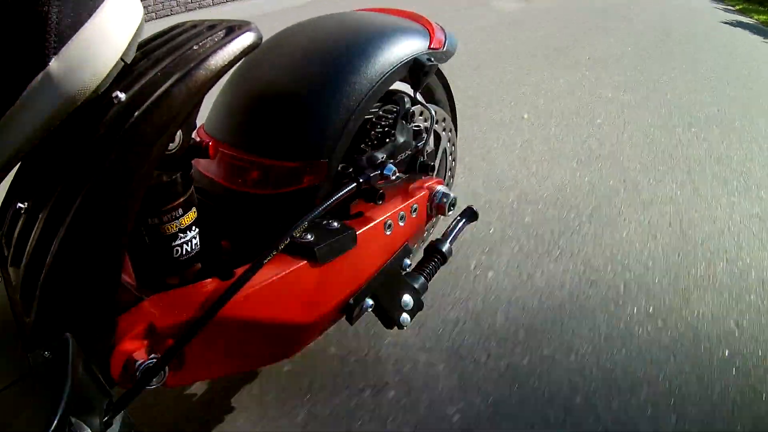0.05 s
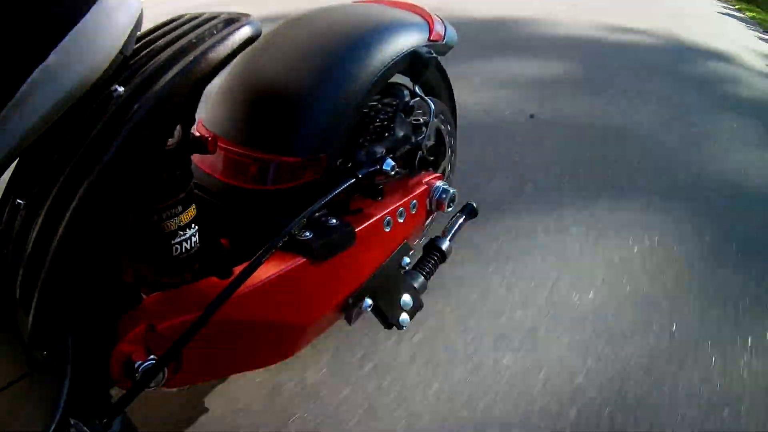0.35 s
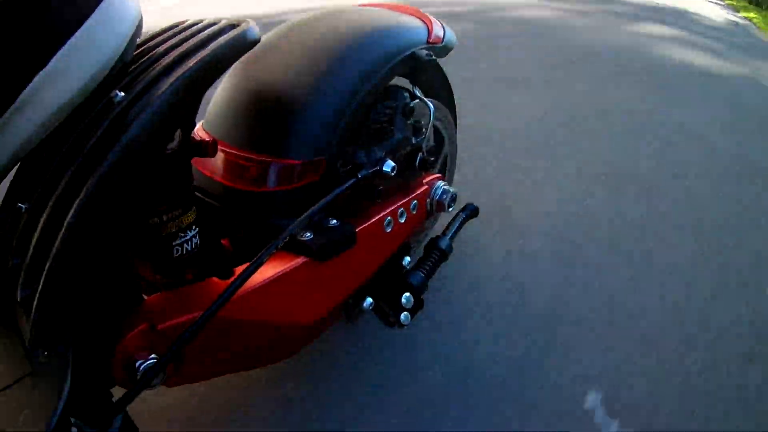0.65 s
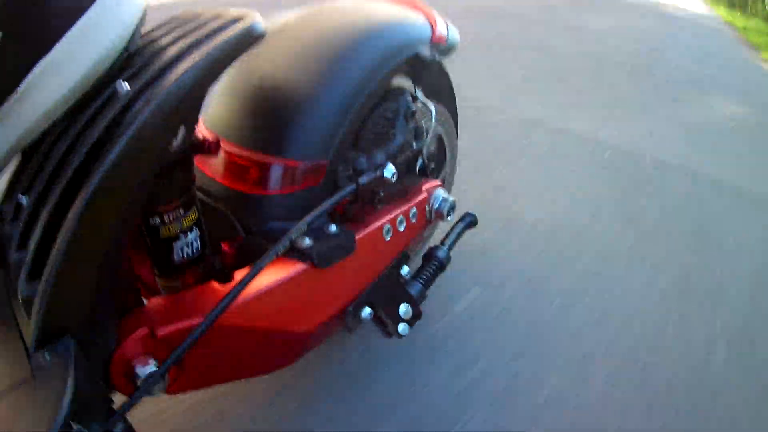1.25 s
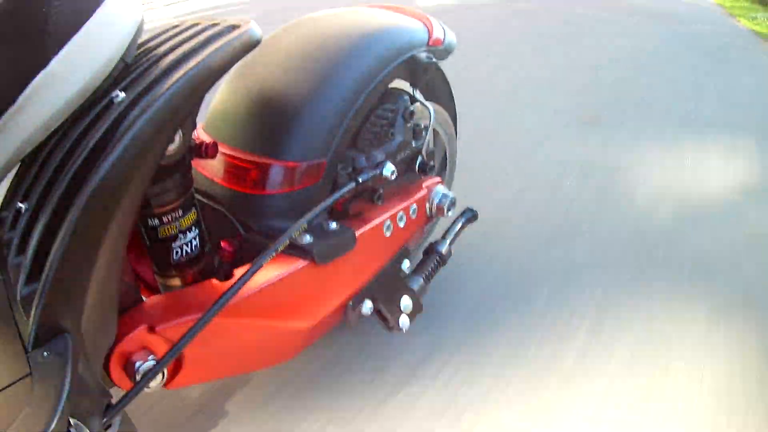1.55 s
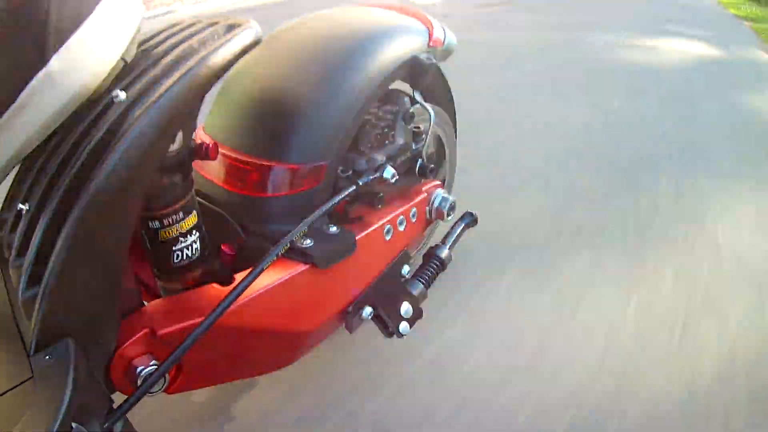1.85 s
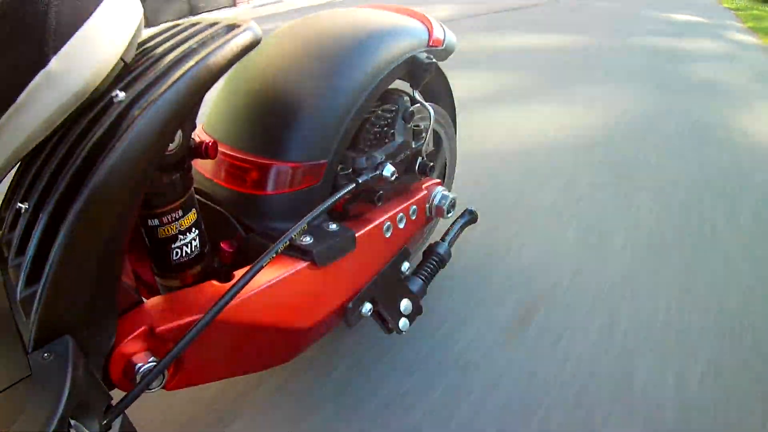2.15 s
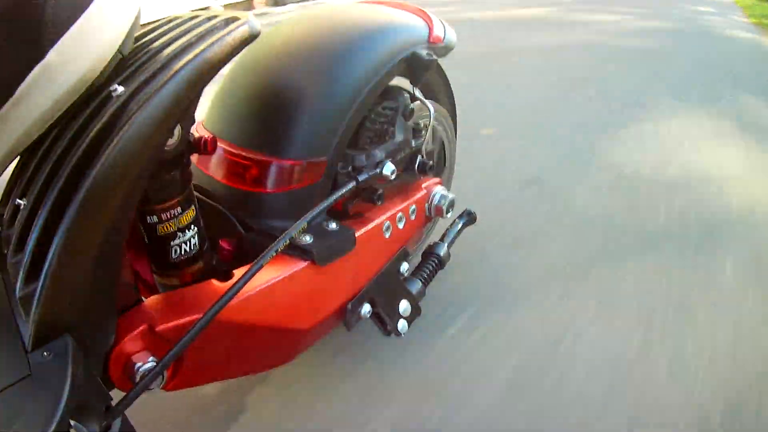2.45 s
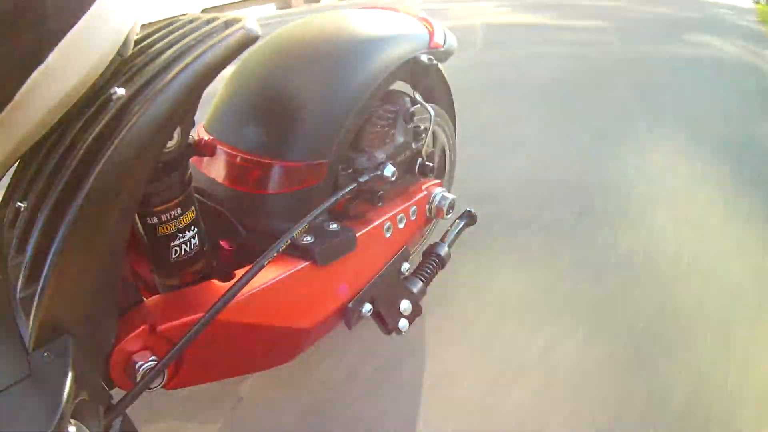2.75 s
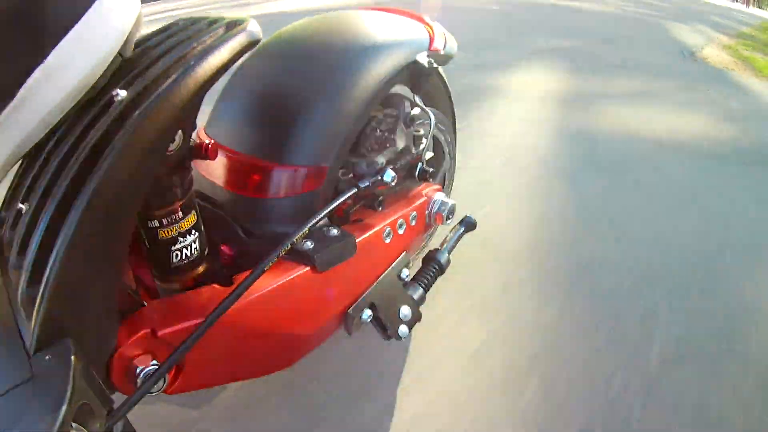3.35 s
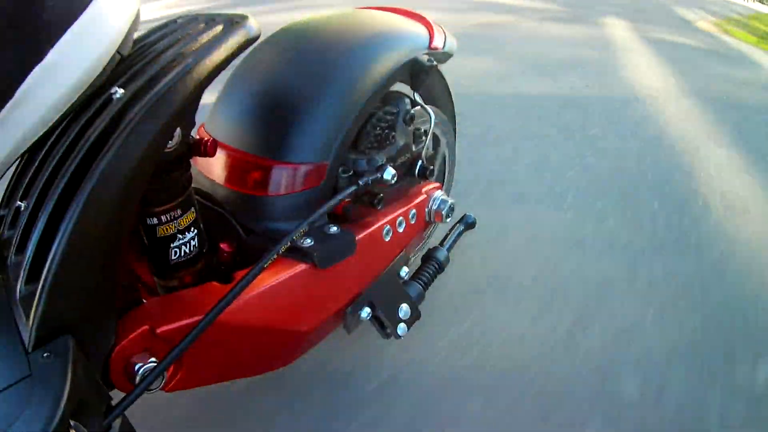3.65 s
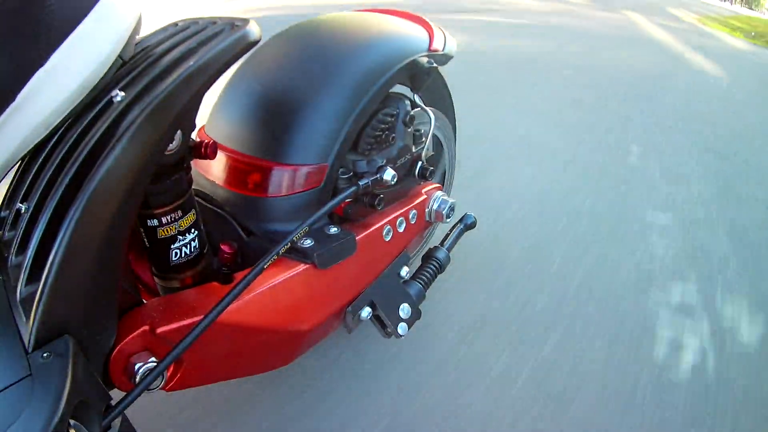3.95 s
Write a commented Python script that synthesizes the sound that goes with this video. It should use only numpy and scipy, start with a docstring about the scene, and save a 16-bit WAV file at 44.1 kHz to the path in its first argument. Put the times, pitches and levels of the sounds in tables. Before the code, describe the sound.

An electric scooter rumbles over asphalt, knocking and rattling at the bumps.

```python
"""Electric scooter on asphalt

Heard beside the rear wheel. The road shakes the frame, which rumbles, knocks and ticks;
two rough patches make the suspension clack. The tyre hisses near 1 kHz and the hub motor
hums faintly. From halfway on the disc brake rubs lightly."""
import sys
import numpy as np
from scipy.fft import rfft, irfft, next_fast_len
from scipy.io import wavfile
from scipy.ndimage import uniform_filter1d, map_coordinates

SR = 44100
rng = np.random.default_rng(int(sys.argv[2]) if len(sys.argv) > 2 else 0)


def dump(signal):
    """Clip the signal to [-1, 1] and save it as 16-bit WAV at the path in sys.argv[1]."""
    limited = np.clip(np.atleast_2d(signal).T, -1, 1)
    pcm = np.round(limited * 32767).astype(np.int16)
    wavfile.write(sys.argv[1], SR, pcm)


N = 176400
HIT_SAMPLES = 4096
HIT_TIME_S = np.arange(HIT_SAMPLES) / SR

# Spectra of a loose part's knock, its thump and a fitting's tick. Each row: frequency in Hz, gain in dB.
KNOCK_SPECTRUM = [(200, -19.5), (600, -0.5), (1100, 10), (1600, -0.5), (2000, -2), (2450, -12.5),
                  (2950, -22), (3400, -23), (4200, -17), (5000, -63), (6200, -33), (7500, -40),
                  (15000, -29)]
THUMP_SPECTRUM = [(15, -26), (40, 2), (100, 0.5), (200, 5.5), (350, -1.5), (550, -9), (800, -16.5),
                  (2000, -43.5), (6000, -79)]
TICK_SPECTRUM = [(1500, -35), (2900, -6), (3500, 7.5), (4100, 4), (4900, -13.5), (5500, 1), (6400, -9),
                 (7500, -30), (10400, -10), (13000, -30)]


def amp(db):
    return 10 ** (np.asarray(db) / 20)


def unit_rms(x):
    return x / np.sqrt(np.mean(x ** 2) + 1e-20)


def unit_hit(x):
    """Scale to the energy of 10 ms at rms 1."""
    return x * np.sqrt(0.01 * SR / (np.sum(x ** 2) + 1e-20))


def decay(t60_s, hold_s=0):
    return amp(-60 * np.maximum(HIT_TIME_S - hold_s, 0) / t60_s)


def gain_at(spectrum, hz):
    """Linear gain from (Hz, dB) rows, on a log frequency axis."""
    knots_hz, db = np.transpose(spectrum)
    return amp(np.interp(np.log(hz + 1), np.log(knots_hz + 1), db))


def curves(rows):
    """One per-sample curve for each column after the time."""
    times_s, *columns = np.transpose(rows)
    return [np.interp(np.arange(N) / SR, times_s, column) for column in columns]


def wobble(rate_hz):
    """Smooth random curve with knots at rate_hz."""
    knots = rng.standard_normal(int(N * rate_hz / SR) + 4)
    return map_coordinates(knots, [np.arange(N) * rate_hz / SR])


def filtered(x, response):
    size = next_fast_len(N + SR // 2)
    return irfft(rfft(x, size) * response(np.fft.rfftfreq(size, 1 / SR)), size)[:N]


def noise(spectrum):
    return unit_rms(filtered(rng.standard_normal(N), lambda hz: gain_at(spectrum, hz)))


def noise_band(centre_hz, width_hz):
    """Narrow noise of rms 1; the centre may move."""
    lowpass = lambda hz: 1 / (1 + (2 * hz / width_hz) ** 2)
    a, b = (filtered(rng.standard_normal(N), lowpass) for _ in range(2))
    phase = 2 * np.pi * np.cumsum(centre_hz * np.ones(N)) / SR
    return unit_rms(a * np.cos(phase) + b * np.sin(phase))


def contact(spectrum, t60_s, grit):
    """Impulse with a gritty tail, through a minimum-phase filter."""
    force = grit * unit_hit(rng.standard_normal(HIT_SAMPLES) * decay(t60_s))
    force[0] -= np.sqrt(0.01 * SR)
    cepstrum = irfft(np.log(gain_at(spectrum, np.fft.rfftfreq(HIT_SAMPLES, 1 / SR))))
    cepstrum[1:HIT_SAMPLES // 2] *= 2
    cepstrum[HIT_SAMPLES // 2 + 1:] = 0
    return unit_hit(irfft(rfft(force) * np.exp(rfft(cepstrum))))


def ping(spectrum, t60_s, count):
    """Small metal part ringing in count random modes under the spectrum."""
    place, phase = rng.uniform(0, 1, (2, count))
    hz = np.interp(np.arange(count) + place, [0, count], [spectrum[0][0], spectrum[-1][0]])
    modes = np.sin(2 * np.pi * (hz[:, None] * HIT_TIME_S + phase[:, None]))
    attack = np.minimum(HIT_TIME_S / 0.0005, 1)
    return unit_hit(gain_at(spectrum, hz) @ modes * decay(t60_s) * attack)


def add(track, start_s, sound):
    i = int(np.clip(round(start_s * SR), 0, N))
    track[i:i + len(sound)] += sound[:N - i]


def frame_rumble(shake_db, turns):
    """The road shakes the frame: rumble swelling once a turn, plus wheel harmonics."""
    # Each row: frequency in Hz, gain in dB.
    spectrum = [(12, -38), (20, 1.5), (30, 5), (55, 1), (120, 0.5), (200, -3.5), (260, -19.5), (350, -20.5),
                (520, -26), (700, -32.5), (900, -26.5), (1200, -74), (2000, -100)]
    # Each row: multiple of the wheel rate, level in dB re the shake.
    harmonics = [(2, -10), (3, -13.5), (4, -18), (5, -21.5)]
    throb_db = 3.5 * np.cos(2 * np.pi * turns)
    out = amp(-2) * noise(spectrum) * unit_rms(amp(throb_db + 1.67 * wobble(45)))
    for multiple, db in harmonics:
        sway = np.sin(2 * np.pi * multiple * turns + 0.5 * wobble(7.8))
        out += amp(db) * unit_rms(sway * amp(4.8 * wobble(13)))
    return amp(shake_db) * out


def suspension_clacks():
    """The suspension hits its stop: metal chatters for a few ms, then the frame rings out."""
    # Each row: start in seconds, level in dB, main ring in Hz, ring in dB re the frame,
    # chatter in seconds, mode tilt in dB per octave, crash in dB re the frame.
    strikes = [(1.1117, -9.5, 1166, -7.5, 0.0049, -1, -19), (2.789, -23, 1860, 5.5, 0.0045, 3, -15),
               (2.917, -12.5, 1254, -2, 0.0056, -1.5, -24.5)]
    # Each row: frequency in Hz, relative level in dB, T60 in seconds.
    frame_modes = [(614, -8.5, 0.037), (1089, 4.5, 0.035), (1304, 4.5, 0.028), (1607, 3.5, 0.016),
                   (1867, 0, 0.047), (2050, 5, 0.018), (2232, -8.5, 0.071), (3440, -13.5, 0.035),
                   (4170, -33, 0.044), (4210, -29, 0.05), (4670, -34, 0.085)]
    # Gritty metal contact. Each row: frequency in Hz, gain in dB.
    crash_spectrum = [(2500, -32), (3400, -1), (4400, 3.5), (5100, -8), (6700, -13), (7500, -34),
                      (10000, -46)]
    out = np.zeros(N)
    attack = 1 - np.exp(-HIT_TIME_S / 0.0012)
    for start_s, db, ring_hz, ring_db, chatter_s, tilt_db, crash_db in strikes:
        frame = np.zeros(HIT_SAMPLES)
        for hz, mode_db, t60_s in frame_modes:
            drift_rad = rng.uniform(0, 2 * np.pi) + np.cumsum(rng.normal(0, 0.069, HIT_SAMPLES))
            mode = np.sin(2 * np.pi * hz * HIT_TIME_S + uniform_filter1d(drift_rad, size=40))
            frame += amp(mode_db + tilt_db * np.log2(hz)) * attack * decay(t60_s, chatter_s) * mode
        ring = unit_hit(attack * decay(0.021, chatter_s) * np.sin(2 * np.pi * ring_hz * HIT_TIME_S))
        crash = contact(crash_spectrum, t60_s=0.088, grit=1.2)
        add(out, start_s, amp(db) * (unit_hit(frame) + amp(ring_db) * ring + amp(crash_db) * crash))
    return out


def knocks():
    """Loose parts knock at the bumps, each with a low thump."""
    # Each row: start in seconds, relative level in dB, thump boost in dB.
    hits = [(.003, -21.5, 10), (0.157, -31, 22), (0.2671, -30.5, 22), (.324, -33.5, 22.5),
            (0.694, -33, 21.5), (1.089, -22.5, 9.5), (1.102, -30.5, 22.5), (1.1177, -21.5, 19.5),
            (1.144, -15, 11), (1.173, -27.5, 18.5), (1.261, -24.5, 0), (1.27, -19, 14), (1.309, -23, 3),
            (1.331, -21, 7), (1.396, -29, 15.5), (1.405, -24.5, 20), (1.4311, -25.5, 15),
            (1.455, -26.5, 20), (1.5337, -26, 5.5), (1.5866, -27, 11.5), (1.6946, -34.5, 9),
            (1.7449, -27.5, 10.5), (1.7993, -30.5, 18), (1.826, -32, 20.5), (2.62, -30, 18),
            (2.9577, -13, 8), (3.0202, -21.5, 4), (3.0496, -27.5, 23), (3.076, -24, 15.5),
            (3.1074, -24, 5.5), (3.153, -22.5, 15), (3.2023, -22.5, 14), (3.252, -25, 17.5),
            (3.279, -24.5, 12)]
    out = np.zeros(N)
    for start_s, db, boost_db in hits:
        add(out, start_s, amp(db - 7.5) * contact(KNOCK_SPECTRUM, t60_s=0.021, grit=1.0))
        add(out, start_s, amp(db + boost_db - 10) * contact(THUMP_SPECTRUM, t60_s=0.032, grit=0.76))
    return out


def claps():
    """A hard, light part, likely the mudguard, claps against its stay."""
    # Each row: start in seconds, relative level in dB.
    hits = [(0.1017, -23), (.486, -28.5), (.537, -22.5), (0.5895, -27.5), (0.642, -26), (1.556, -30.5),
            (2.08, -31)]
    # Each row: frequency in Hz, gain in dB.
    spectrum = [(100, -11), (700, 5.5), (1400, 5.5), (1950, -2), (2450, -3.5), (3000, -22), (4100, -23),
                (7000, -46)]
    out = np.zeros(N)
    for start_s, db in hits:
        add(out, start_s, amp(db - 5) * contact(spectrum, t60_s=0.018, grit=2.8))
    return out


def wheel_rattle(shake_db, turns):
    """Loose parts bounce lightly twice a turn, louder with the shake up to a cap."""
    cap_db, limp_db, scatter_db, jitter_s = -17, 0.5, 3.5, 0.003
    out = np.zeros(N)
    bounces = np.flatnonzero(np.diff(np.floor(2 * turns)) > 0)
    for k, i in enumerate(bounces):
        start_s = i / SR + rng.normal(0, jitter_s)
        db = min(shake_db[i], cap_db) - 18 + limp_db * (-1) ** k + rng.normal(0, scatter_db)
        knock = amp(-3.5) * contact(KNOCK_SPECTRUM, t60_s=0.014, grit=1.5)
        thump = amp(10) * contact(THUMP_SPECTRUM, t60_s=0.023, grit=2.3)
        tick = amp(-20) * contact(TICK_SPECTRUM, t60_s=0.022, grit=1.0)
        add(out, start_s, amp(db) * (knock + thump + tick))
    return out


def tyre():
    """Tread noise, strongest just over 1 kHz, where stones and seams also ring the casing."""
    # Each row: time in seconds, level in dB.
    tread_levels = [(0, -41), (1.3, -41.5), (1.7, -45), (2.3, -38), (3.1, -38), (3.4, -40.5), (4, -39.5)]
    # Each row: frequency in Hz, gain in dB.
    spectrum = [(180, -68), (300, -8), (318, -25), (360, -6.5), (472, -32.5), (550, -10.5), (756, -19.5),
                (981, -17.5), (1030, -7), (1220, -3), (1460, -18.5), (1540, -20), (1940, -18.5),
                (2200, -32.5), (3000, -47), (6600, -120)]
    # Each row: start in seconds, level in dB, pitch in Hz.
    casing_hits = [(.435, -29.5, 1044), (1.26, -21, 1024), (3.088, -28.5, 1040), (3.102, -25.5, 1100)]
    tread_db, = curves(tread_levels)
    out = noise(spectrum) * amp(tread_db + 0.28 * wobble(30))
    envelope = (1 - np.exp(-HIT_TIME_S / 0.0021)) * decay(t60_s=0.028)
    for start_s, db, hz in casing_hits:
        add(out, start_s, amp(db) * unit_hit(np.sin(2 * np.pi * hz * HIT_TIME_S) * envelope))
    return out


def hub_motor():
    """Faint, rough hum in two stretches of falling pitch."""
    # One list per stretch. Each row: time in seconds, pitch in Hz, level in dB.
    stretches = [
        [(0, 318, -39.5), (.3, 294.3, -37.5), (.7, 288.9, -34), (1.0, 287.4, -42), (1.1, 290, -115)],
        [(2.05, 383, -55.5), (2.35, 369.2, -40), (2.6, 350.1, -40), (2.85, 333.2, -40), (3.2, 320, -42)],
    ]
    out, t = np.zeros(N), np.arange(N) / SR
    for rows in stretches:
        hz, db = curves(rows)
        gate = (t >= rows[0][0]) & (t < rows[-1][0])
        out += noise_band(hz, width_hz=21) * amp(db) * gate
    return out


def frame_clatter(shake_db):
    """Continuous loose clatter and fizz, growing with the shake."""
    # Each row: frequency in Hz, gain in dB.
    fizz_spectrum = [(500, 1), (1100, 16.5), (2000, 1), (4000, 0), (5000, -3.5), (6000, -8.5),
                     (10300, -6.5), (15500, -10)]
    excess_db = shake_db - shake_db.mean()
    clatter = noise(KNOCK_SPECTRUM) * amp(-47.5 + 0.82 * excess_db + 3.1 * wobble(160))
    fizz = noise(fizz_spectrum) * amp(-54 + 0.88 * excess_db + 1.76 * wobble(90) + 1.7 * wobble(35))
    return clatter + fizz


def fittings():
    """Small metal fittings tick and, higher up, tinkle."""
    # Each row: start in seconds, relative level in dB.
    ticks = [(0.1278, -40), (0.3106, -35.5), (0.9417, -41.5), (1.1969, -32.5), (1.257, -33), (1.2694, -30),
             (1.3097, -33), (1.3595, -29.5), (1.43, -41), (1.7998, -39), (3.009, -30), (3.021, -29),
             (3.1554, -30.5), (3.2053, -30)]
    tinkles = [(1.256, -51), (1.271, -40.5), (1.374, -46.5), (3.225, -48)]
    # Each row: frequency in Hz, gain in dB.
    tinkle_spectrum = [(7500, -25), (8900, -6), (9600, -12), (10400, 1), (11000, -13), (11800, -26)]
    out = np.zeros(N)
    for start_s, db in ticks:
        add(out, start_s, amp(db - 12.5) * ping(TICK_SPECTRUM, t60_s=0.033, count=26))
    for start_s, db in tinkles:
        add(out, start_s, amp(db - 3.5) * ping(tinkle_spectrum, t60_s=0.042, count=9))
    return out


def disc_brake(turns):
    """The pad rubs, swelling once a turn; the disc rings and sings thinly under a wavering hiss."""
    # Each row: time in seconds, level in dB.
    rub_levels = [(2.05, -70), (2.2, -61.5), (2.4, -58), (2.9, -55.5), (3.4, -57.5), (4, -55)]
    sing_levels = [(2.1, -96), (2.24, -68), (2.37, -56), (2.46, -60), (2.85, -56.5), (3.04, -50.5),
                   (3.34, -58), (3.46, -64), (3.53, -48), (3.62, -57), (4, -58.5)]
    # Each row: frequency in Hz, width in Hz, gain in dB.
    disc_modes = [(3350, 66, -4.5), (3760, 160, -6), (3860, 210, -19), (4450, 75, -13.5)]
    # Each row: time in seconds, level in dB, centre in Hz, upper band in dB re the main band.
    hiss_track = [(2.08, -88, 6360, -18), (2.16, -68, 6360, -23), (2.7, -64.5, 6330, -27),
                  (3.3, -66, 6210, -20), (3.52, -64, 6174, -17), (3.75, -68.5, 6120, -7),
                  (4, -70, 6150, -7)]
    rub_db, = curves(rub_levels)
    sing_db, = curves(sing_levels)
    hiss_db, hiss_hz, upper_db = curves(hiss_track)
    disc = lambda f: sum(amp(db) / (1 + (2 * (f - hz) / width_hz) ** 2) ** 0.57
                         for hz, width_hz, db in disc_modes)
    swell_db = 1.5 * np.sin(2 * np.pi * turns)
    rub = unit_rms(filtered(rng.standard_normal(N), disc)) * amp(rub_db + swell_db + 1.9 * wobble(19))
    sing = noise_band(3240, width_hz=31) * amp(sing_db)
    waver = 1 + 0.0031 * wobble(16)
    hiss = noise_band(hiss_hz * waver, width_hz=800)
    hiss += amp(upper_db) * noise_band(7360 * waver, width_hz=400)
    return rub + sing + hiss * amp(hiss_db + 2.2 * wobble(40))


def scene():
    # Road shaking the frame. Each row: time in seconds, level in dB.
    shake_levels = [(0, -24.5), (.17, -18.5), (.5, -22.5), (.66, -18.5), (1.05, -31.5), (1.11, -14.5),
                    (1.23, -17), (1.29, -11.5), (1.42, -16.5), (1.54, -20.5), (2.15, -26), (2.83, -23.5),
                    (2.99, -11), (3.05, -15), (3.3, -15.5), (3.35, -25.5), (4, -31)]
    shake_db, = curves(shake_levels)
    wheel_hz = 19.3 * (1 + 0.025 * wobble(5))
    turns = np.cumsum(wheel_hz) / SR
    frame = frame_rumble(shake_db, turns) + frame_clatter(shake_db)
    wheel = tyre() + hub_motor() + disc_brake(turns)
    impacts = suspension_clacks() + knocks() + claps() + fittings() + wheel_rattle(shake_db, turns)
    return (frame + wheel + impacts)[None]


def record(dry):
    """Round off the highest peaks, then cut above 15.8 kHz."""
    rounded = dry[0] / (1 + np.abs(dry[0]) ** 8) ** (1 / 8)
    return filtered(rounded, lambda hz: hz < 15800)[None]


dry = scene()
out = record(dry)
dump(out)
```